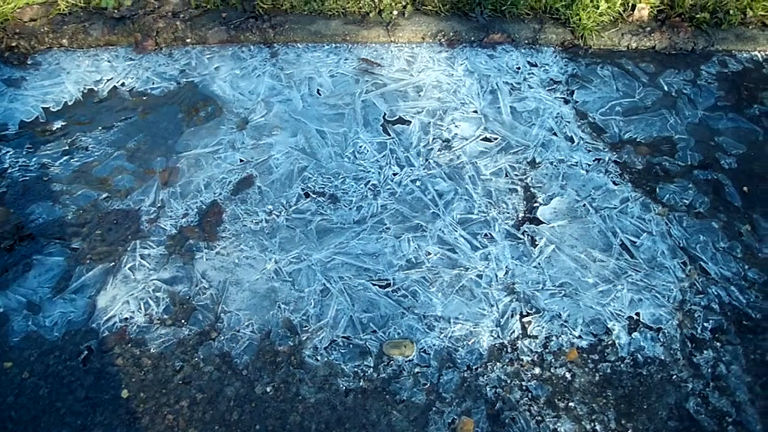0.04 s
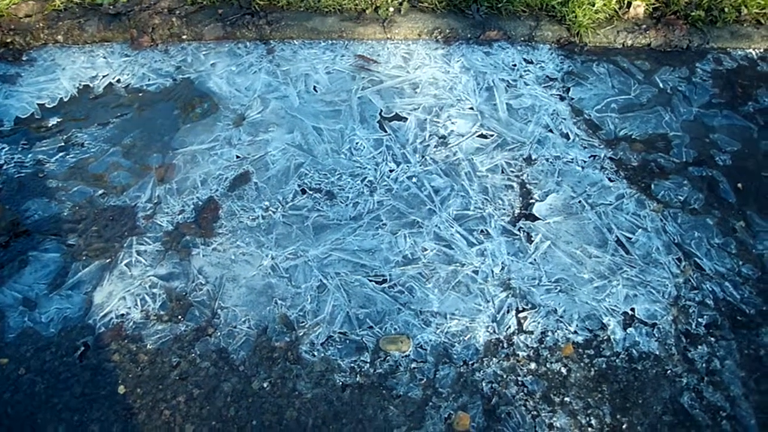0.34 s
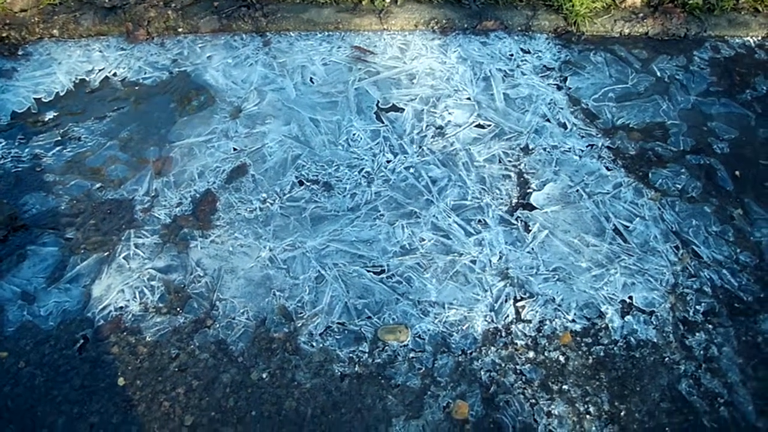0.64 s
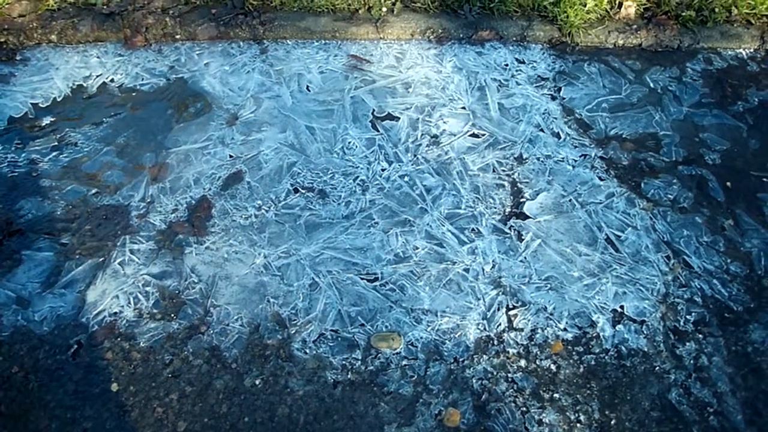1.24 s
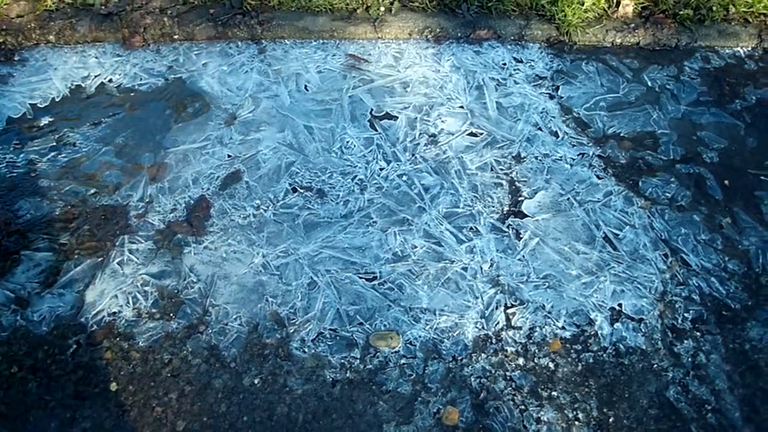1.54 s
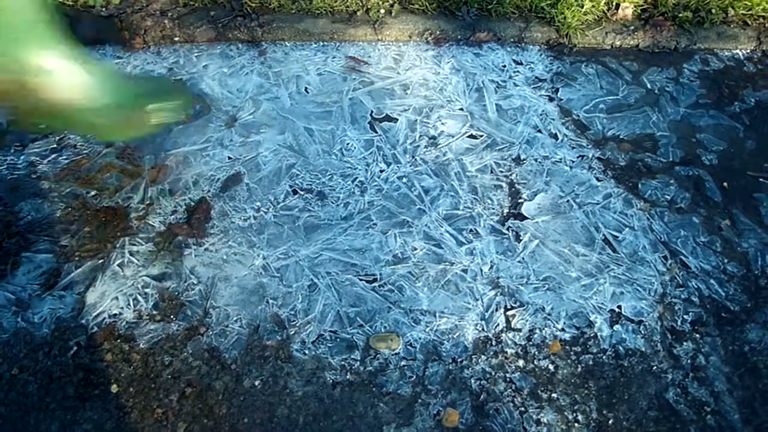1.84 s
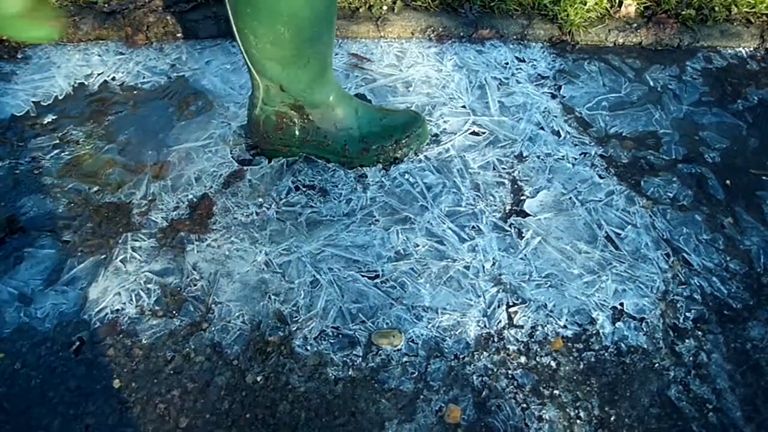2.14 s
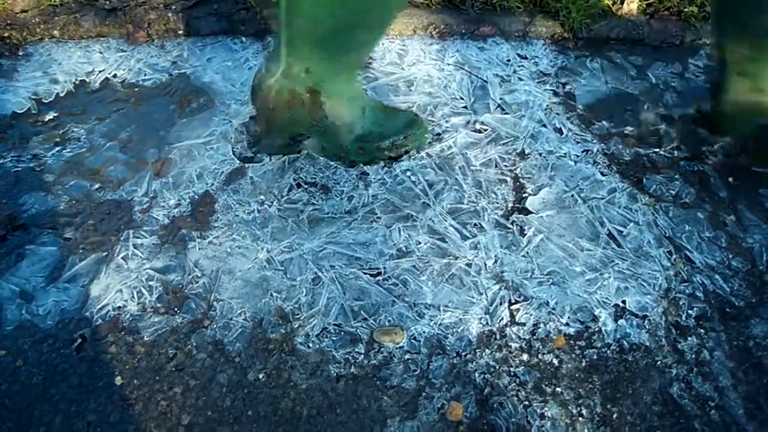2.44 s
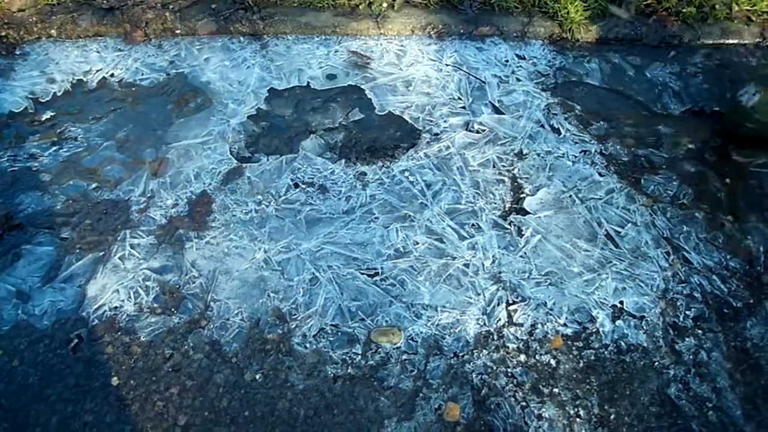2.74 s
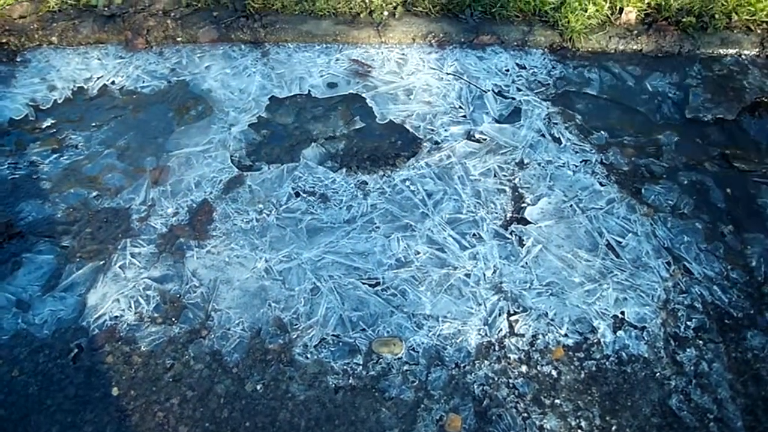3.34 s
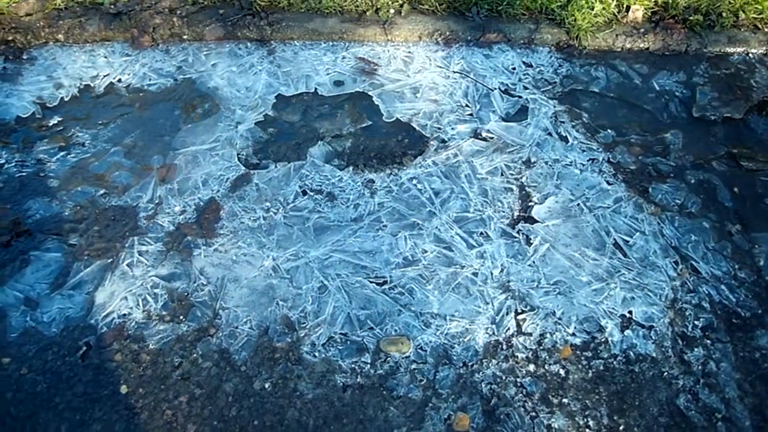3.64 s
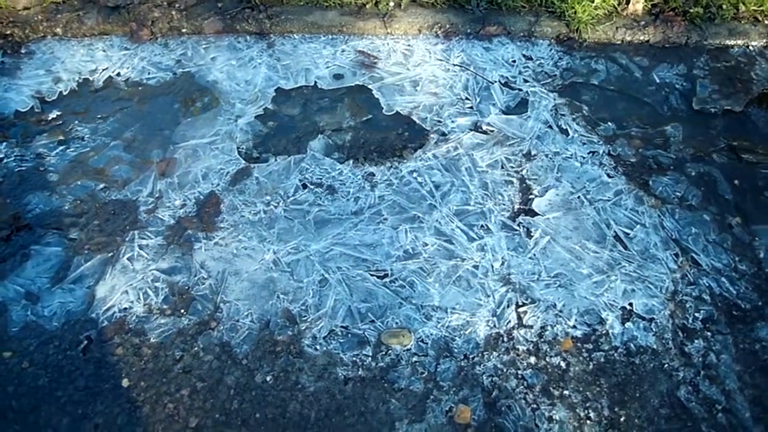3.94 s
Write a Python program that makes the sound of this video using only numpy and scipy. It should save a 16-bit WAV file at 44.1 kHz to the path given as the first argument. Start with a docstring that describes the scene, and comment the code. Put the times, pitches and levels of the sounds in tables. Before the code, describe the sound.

Thin ice cracking and crunching under rubber boots walking through a frozen puddle outdoors.

```python
"""Rubber boots walk from left to right over frosty tarmac and through the thin ice of a puddle.
Each step is a run of brittle cracks over crunching grit; where air lies under the ice it sounds hollow.
Heels thud, bubbles blip, chips of ice ring and a sole scuffs at the end.
Wind rumbles on the two nearby microphones, over a faint outdoor hiss."""
import sys
import numpy as np
from scipy import signal
from scipy.fft import rfft, irfft
from scipy.io import wavfile
from scipy.ndimage import uniform_filter1d, map_coordinates

SR = 44100
rng = np.random.default_rng(int(sys.argv[2]) if len(sys.argv) > 2 else 0)


def generate_wav(sig):
    """Save sig (samples, or channels by samples) to the path in sys.argv[1] as 16-bit PCM at SR."""
    pcm = np.round(np.clip(np.atleast_2d(sig).T, -1, 1) * 32767).astype(np.int16)
    wavfile.write(sys.argv[1], SR, pcm)


N = 176400
T = np.arange(N) / SR
TOP_HZ = 15900


def undb(db):
    """Turn decibels into a number to multiply by."""
    return 10 ** (np.asarray(db) / 20)


def unit(x):
    """Scale a signal to an average power of 1."""
    return x / np.sqrt(np.mean(x ** 2))


def curve(points):
    """Join (time, value) points with straight lines."""
    return np.interp(T, *np.array(points).T)


def colour(x, points, keep_power=True, size=4096):
    """Shape the tone through (Hz, dB) points; by default white noise keeps its power."""
    hz, db = np.array(points).T
    bin_hz = np.arange(size // 2 + 1) * SR / size
    gain = undb(np.interp(np.log(bin_hz + 1), np.log(hz), db))
    cepstrum = irfft(np.log(unit(gain) if keep_power else gain))
    # fold it so that the filter rings only after a sound, never before
    cepstrum[1:size // 2] *= 2
    cepstrum[size // 2 + 1:] = 0
    return signal.fftconvolve(x, irfft(np.exp(rfft(cepstrum))))[:N]


def add(out, start, sound):
    """Mix a sound in at a start time in seconds."""
    i = int(start * SR)
    out[i:i + len(sound)] += sound[:N - i]


def wander(per_s, size=4096):
    """A value that drifts at random, by about 1 either way."""
    return unit(np.interp(T * per_s, np.arange(size), rng.standard_normal(size)))


def outdoors():
    """Gusts rumble on the microphones, differing only in the deep bass, over a distant hiss."""
    # tone of the wind and of the hiss (frequency [Hz], level [dB])
    wind_tone = [(35, -0.5), (70, 0.5), (110, -8.5), (400, -16.5), (800, -26.5), (3000, -42.5)]
    hiss_tone = [(1000, -5), (1280, 2.5), (1700, -8), (4000, -5), (7000, -15), (15500, -26.5)]
    # level of the rumble, which dips after the loudest crack as the recorder turns itself down,
    # then recovers (time [s], level [dB])
    rumble_level = [(0, -43), (.55, -45), (.75, -41), (1.4, -42), (1.93, -46), (2.05, -53), (2.6, -50),
                    (3.2, -40.5), (3.95, -41.5)]
    # the hiss jumps up midway, then eases (time [s], level change [dB])
    hiss_change = [(1.95, -21), (2.02, -4.5), (2.3, -12), (2.9, -7.5)]
    gust_db, hiss_db = 2, -41.5
    mid, side = (colour(rng.standard_normal(N), wind_tone) * undb(gust_db * wander(per_s=11))
                 for _ in range(2))
    side = undb(-4) * signal.sosfilt(signal.butter(2, 89, fs=SR, output="sos"), side)
    rumble = np.array([mid - side, mid + side]) * undb(curve(rumble_level))
    hiss = np.array([colour(rng.standard_normal(N), hiss_tone) for _ in range(2)])
    return rumble + hiss * undb(hiss_db + curve(hiss_change))


def clicks(spread, size):
    """Tiny breaks: mostly weak clicks, with a few far stronger."""
    sign, strength = rng.standard_normal((2, size))
    return np.sign(sign) * np.exp(spread * np.minimum(strength, 3))


def crush(presses, spread, patchy_db):
    """Clumps of tiny breaks, as weight rolls on to the sole and off again."""
    weight = sum(undb(db) * np.exp(-np.maximum((at - T) / rise, (T - at) / fall))
                 for at, rise, fall, db in presses)
    return weight * unit(clicks(spread, N) * undb(patchy_db * wander(per_s=170)))


def fractures(size=2048):
    """Each crack opens with one sharp snap and runs on as a burst of clicks, over crunching crumbs."""
    # cracks running through the ice (time [s], length [s], level [dB])
    cracks = [(0.071, 0.0052, -38), (0.555, 0.0044, -30), (0.583, 0.0086, -23.5), (0.667, 0.0072, -35.5),
              (1.051, 0.0018, -24), (1.056, 0.0016, -22.5), (1.0768, 0.011, -19.5), (1.106, 0.0071, -23),
              (1.1187, 0.003, -24), (1.4514, 0.00075, -15.5), (1.477, 0.0018, -32), (1.487, 0.0038, -26.5),
              (1.5084, 0.0018, -21), (1.534, 0.004, -23), (1.9334, 0.0012, -31), (1.9594, 0.0058, -14.5),
              (1.973, 0.0045, -19), (1.986, 0.0083, -25), (2.002, 0.013, -22), (2.0975, 0.016, -36.5),
              (2.121, 0.0094, -23), (2.2747, 0.00068, -12), (2.3277, 0.0095, -29.5), (2.35, 0.004, -27),
              (2.3902, 0.0015, -29), (2.401, 0.0059, -24.5), (2.408, 0.0063, -18), (2.42, 0.0034, -28),
              (2.4415, 0.0097, -27.5), (2.468, 0.0025, -27.5), (2.633, 0.0018, -30),
              (2.657, 0.00094, -26.5), (2.676, 0.003, -28), (2.831, 0.0014, -31), (2.843, 0.0081, -26.5),
              (2.857, 0.0028, -22), (2.878, 0.0015, -22.5), (2.899, 0.0013, -18.5), (2.903, 0.0015, -14),
              (2.927, 0.0009, -21.5), (2.982, 0.0031, -26.5), (3.026, 0.0025, -22), (3.033, 0.0045, -21),
              (3.112, 0.0014, -21), (3.216, 0.0031, -31), (3.2741, 0.0049, -32), (3.509, 0.0083, -22)]
    # grit crushed under the sole (time of most weight [s], rise [s], fall [s], level [dB])
    crunches = [(.37, 0.076, 0.27, -44), (.588, 0.021, 0.021, -29), (.843, 0.041, 0.014, -44.5),
                (1.085, 0.027, 0.026, -29), (1.40, 0.1, 0.061, -43), (1.505, 0.019, 0.037, -27),
                (1.558, 0.0098, 0.012, -25.5), (1.83, 0.12, 0.13, -37.5), (2.008, 0.0087, 0.0088, -18.5),
                (2.412, 0.02, 0.035, -31), (2.49, 0.052, 0.12, -35), (2.885, 0.034, 0.13, -26),
                (3.2, 0.028, 0.027, -38), (3.44, 0.049, 0.059, -27)]
    out = crush(crunches, spread=1.4, patchy_db=3)
    for at, run_s, db in cracks:
        fade = np.exp(-np.maximum(T[:size] - run_s, 0) / min(.003, run_s))
        burst = clicks(spread=.99, size=size) * fade
        burst[0] = .6 * np.sqrt(np.sum(burst ** 2))  # the opening snap
        burst *= np.sqrt((run_s + .001) * SR / np.sum(burst ** 2))  # longer cracks carry more energy
        add(out, at, undb(db) * burst)
    return out


def ice():
    """Breaking ice snaps, sets flakes ringing, splinters and sounds hollow over trapped air."""
    # tone of each part of the sound (frequency [Hz], level [dB])
    snap_tone = [(100, -21), (400, -12.5), (1700, -6), (3600, 2.5), (5000, -1.5), (7000, -16.5),
                 (10500, -15.5), (15500, -33)]
    splinter_tone = [(2000, -35), (6000, 8.5), (9000, -0.5), (15500, -4.5)]
    hollow_tone = [(260, -17), (450, -5.5), (650, -2.5), (950, -0.5), (1300, -6.5), (2000, -8),
                   (12000, -85)]
    # how splintery and how hollow the ice is underfoot (time [s], level change [dB])
    splintering = [(.6, -15), (1.5, -14), (2, -21), (2.9, -23)]
    hollowness = [(.35, -4.5), (.6, -15), (1.1, -13.5), (1.5, -10), (1.96, -4), (2.12, -7.5), (2.28, -9.5),
                  (2.5, -5), (3.1, -17)]
    breaking = fractures()
    snap = undb(-2) * colour(breaking, snap_tone) + shards(breaking)
    splinters = colour(fractures() * undb(curve(splintering)), splinter_tone)
    hollow = colour(fractures() * undb(curve(hollowness)), hollow_tone)
    return snap + splinters + hollow


def shards(breaking, count=900, size=2048):
    """Loose flakes ring briefly, each at its own pitch, louder where more ice is breaking."""
    middle_hz, spread_octaves, decay_cycles = 2620, .9, 6.7
    out, t = np.zeros(N), T[:size]
    force = np.sqrt(abs(uniform_filter1d(breaking ** 2, size=600, origin=299)))  # recent loudness
    times = rng.uniform(0, T[-1], count)
    for at, (pitch, strength) in zip(times, np.clip(rng.standard_normal((count, 2)), -2, 2)):
        hz = min(middle_hz * 2 ** (spread_octaves * pitch), TOP_HZ)
        ring = np.sin(2 * np.pi * hz * t) * np.exp(-t * hz / decay_cycles)
        add(out, at, force[int(at * SR)] * undb(-14 + 6 * strength) * ring)
    return out


def bubbles(size=4096):
    """Air bubbles in the water under the ice ring as short tones that rise in pitch."""
    # bubbles (time [s], pitch [Hz], pitch rise [Hz/s], time to peak [s], level [dB])
    blips = [(.071, 960, 1000, 0.0029, -37), (1.243, 1135, 48300, 0.0091, -41),
             (1.32, 1166, 2000, 0.0028, -37), (1.400, 1126, 3000, 0.0041, -34.5)]
    out, t = np.zeros(N), T[:size]
    for at, hz, rise, peak_s, db in blips:
        swell = 2 * t / peak_s * np.exp(-(t / peak_s) ** 2 / 2)
        add(out, at, undb(db) * swell * np.sin(2 * np.pi * (hz * t + rise * t ** 2 / 2)))
    return out


def thuds(size=16384):
    """Soft rubber lands with a dull shudder that dies quickly."""
    # heel and sole landing (time [s], level [dB], fade time [s])
    landings = [(.583, -30, 0.021), (0.654, -33, 0.02), (1.071, -30, 0.021), (2.869, -40, 0.062),
                (3.36, -30.5, 0.015), (3.418, -31.5, 0.039), (3.856, -35, 0.043)]
    # tone of a thud (frequency [Hz], level [dB])
    thud_tone = [(40, -29), (170, -2), (320, -11), (600, -17.5), (2000, -108)]
    out = np.zeros(N)
    for at, db, decay in landings:
        add(out, at, undb(db) * rng.standard_normal(size) * np.exp(-T[:size] / decay))
    return colour(out, thud_tone)


def chips(decay_s=.013):
    """Small, thin chips of ice ring as they land."""
    # chips landing (time [s], pitch [Hz], level [dB])
    pings = [(0.668, 3350, -31.5), (3.48, 13300, -41), (3.526, 8270, -41)]
    out = np.zeros(N)
    for at, hz, db in pings:
        add(out, at, undb(db) * np.sin(2 * np.pi * hz * T) * np.exp(-T / decay_s))
    return out


def knocks(decay_s=.007, overtone_ratio=1.55):
    """The ice sheet gives way and rings briefly on the air beneath, with one weaker, higher tone."""
    # pockets of air knocking (time [s], pitch [Hz], level [dB])
    pockets = [(1.812, 846, -33), (1.96, 425, -22), (1.961, 930, -25), (1.988, 740, -20),
               (2.005, 632, -19.5), (2.116, 602, -25), (2.928, 534, -27), (3.034, 552, -30)]
    out = np.zeros(N)
    for at, hz, db in pockets:
        phase = 2 * np.pi * hz * T
        ring = np.sin(phase) + np.sin(overtone_ratio * phase) / 2
        add(out, at, undb(db) * ring * np.exp(-T / decay_s))
    return out


def scuff():
    """A rubber sole slides over frost, with a finer, more even grain than a crunch."""
    # drags of the sole (time of most weight [s], rise [s], fall [s], level [dB])
    drags = [(3.827, 0.028, 0.013, -19.5), (3.882, 0.024, 0.019, -24), (3.95, 0.044, 0.019, -28.5)]
    # tone of the scuff (frequency [Hz], level [dB])
    scuff_tone = [(700, -18.5), (1100, -4), (1900, -7), (3200, 2), (3900, 0.5), (5500, -18), (10000, -24),
                  (15500, -42)]
    return colour(crush(drags, spread=.9, patchy_db=1.5), scuff_tone)


def echoes(decay_s, size=4096):
    """A blur of echoes that dies away, without bass."""
    noise = signal.lfilter(*signal.butter(1, 1380, "high", fs=SR), rng.standard_normal(size))
    tail = noise * np.exp(-T[:size] / decay_s)
    return tail / np.sqrt(np.sum(tail ** 2))


def ground(x, size=512):
    """Sound bounces off ground, legs and things further off; each short slice gets its own echoes."""
    out, fade = np.zeros(N), np.sin(np.pi * np.arange(size) / size)
    for i in range(0, N - size, size // 2):
        near = undb(-4) * echoes(decay_s=.0022)
        far = undb(-19) * echoes(decay_s=.014)
        add(out, i / SR, signal.fftconvolve(x[i:i + size] * fade, near + far))
    return out


def scene():
    """The boots pass from left to right, so their sound reaches the two microphones at different times."""
    # the walker's place (time [s], delay at the right microphone [ms])
    path = [(1.1, 0.117), (2, 0.063), (3, -0.07), (3.8, -0.19)]
    left = ice() + knocks() + scuff() + bubbles() + chips()
    right = map_coordinates(left, [(T - curve(path) / 1000) * SR], mode="nearest")
    return np.array([x + ground(x) for x in (left, right)]) + thuds() + outdoors()


def record(dry):
    """Each microphone has its own tone; loud peaks are rounded and the highest treble is cut."""
    # tone of each microphone (frequency [Hz], level [dB])
    left_mic = [(300, 0.5), (1100, 3.5), (2200, -5), (2900, -9.5), (4700, -12), (7000, 2), (10000, 3.5)]
    right_mic = [(300, 0.5), (1100, -0.5), (1800, 2.5), (6500, 0.5), (10000, -5.5), (15500, -2.5)]
    ceiling, stop_s = 1.2, 3.965
    heard = np.array([colour(x, mic, keep_power=False) for x, mic in zip(dry, (left_mic, right_mic))])
    heard = ceiling * np.tanh(heard / ceiling)
    heard *= np.clip((stop_s - T) / .004, 0, 1)  # quick fade to silence
    return signal.sosfilt(signal.ellip(8, .2, 80, TOP_HZ, fs=SR, output="sos"), heard)


dry = scene()
out = record(dry)
generate_wav(out)
```